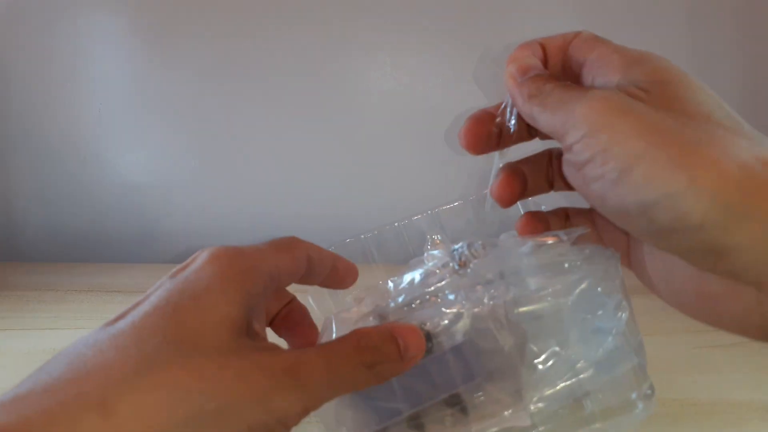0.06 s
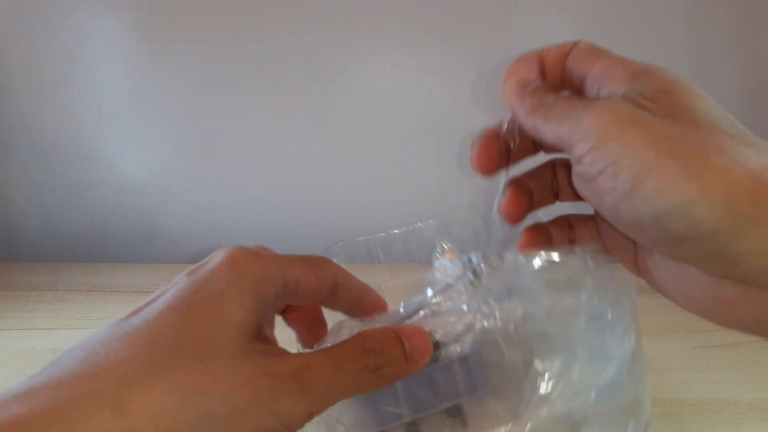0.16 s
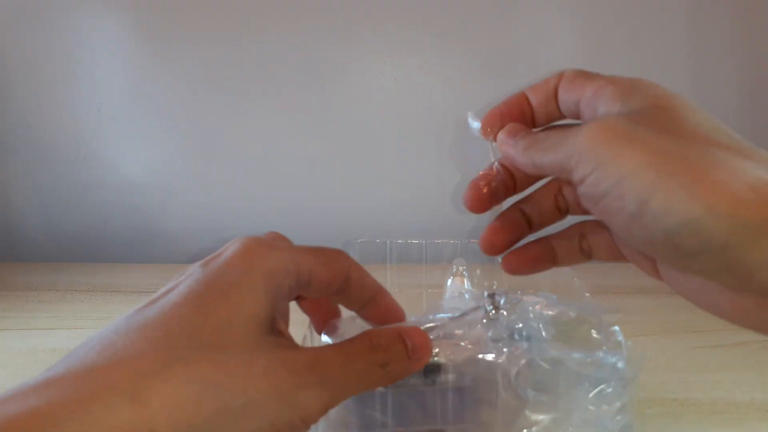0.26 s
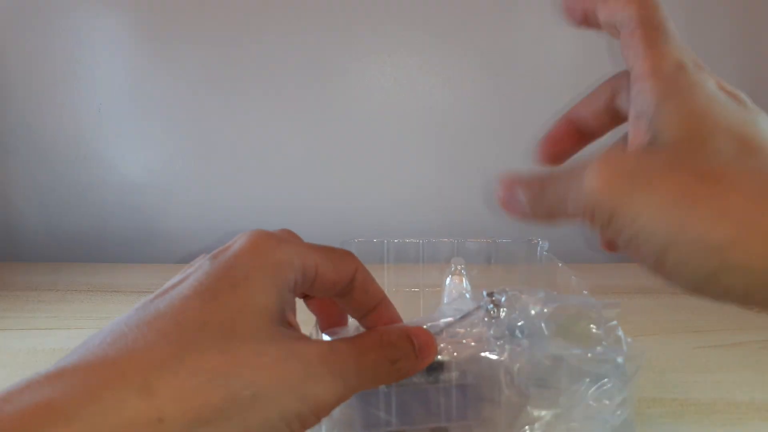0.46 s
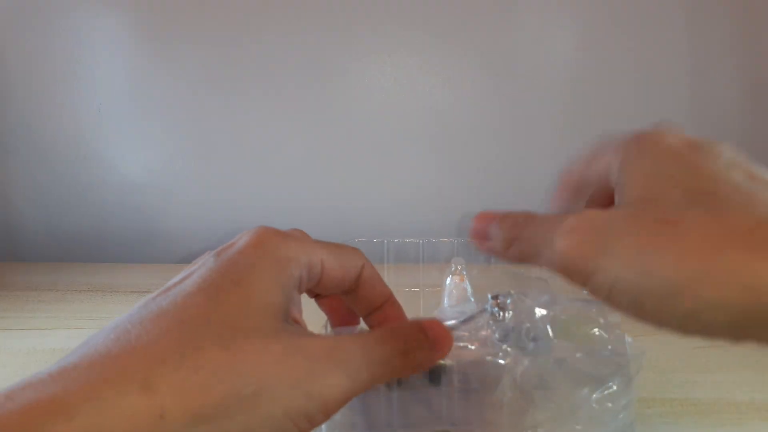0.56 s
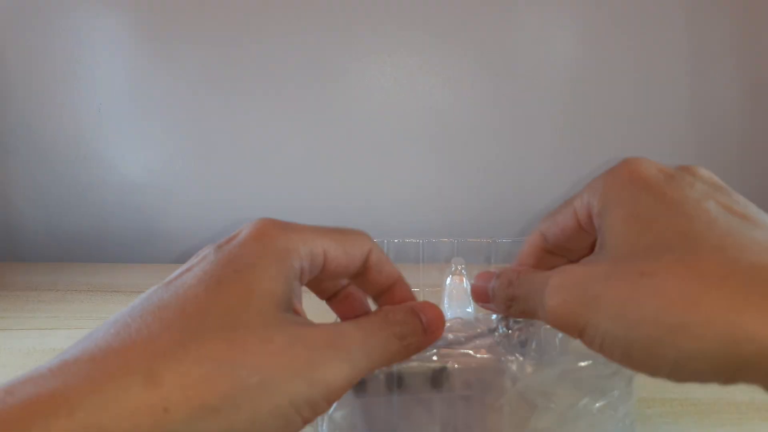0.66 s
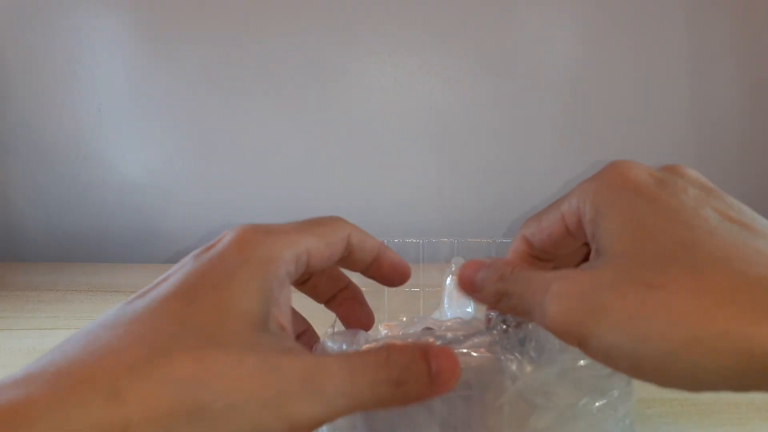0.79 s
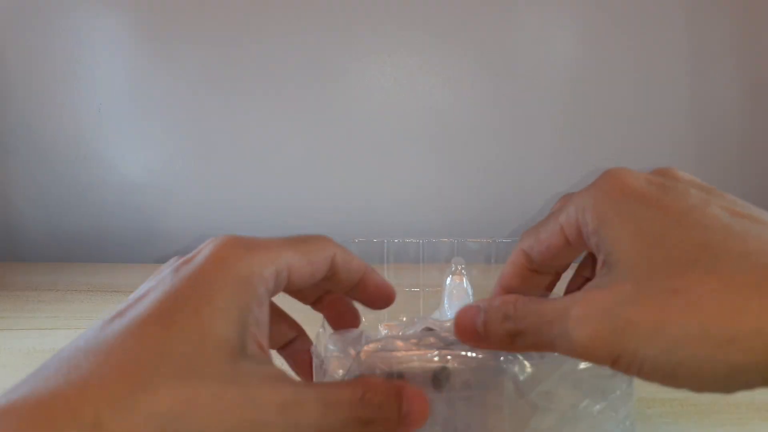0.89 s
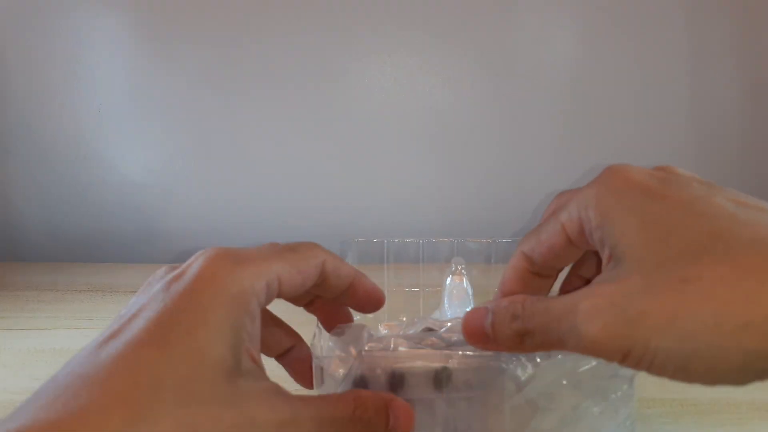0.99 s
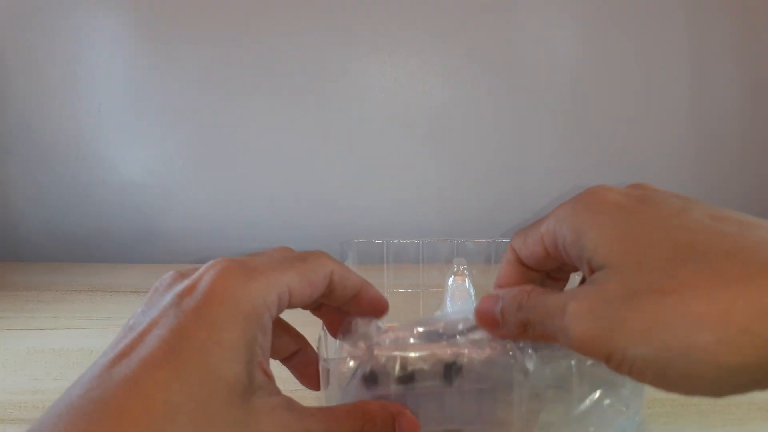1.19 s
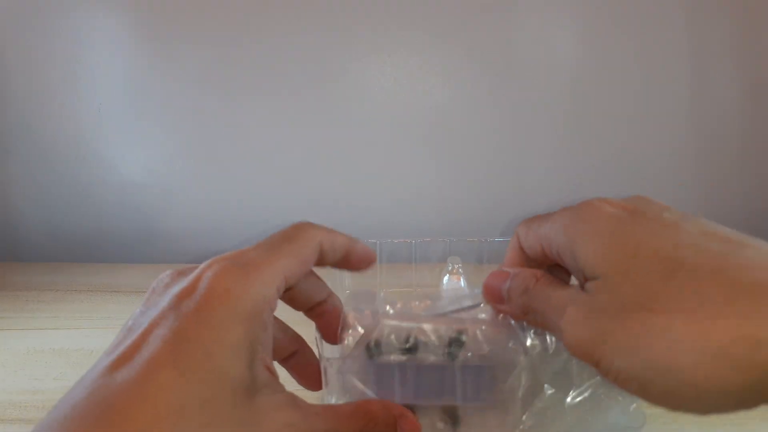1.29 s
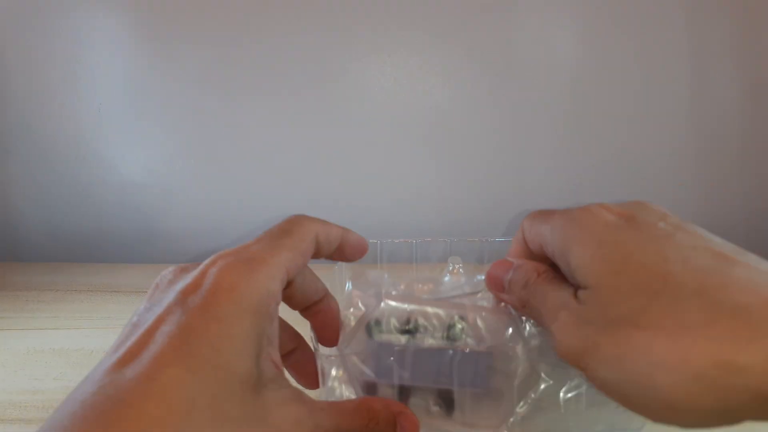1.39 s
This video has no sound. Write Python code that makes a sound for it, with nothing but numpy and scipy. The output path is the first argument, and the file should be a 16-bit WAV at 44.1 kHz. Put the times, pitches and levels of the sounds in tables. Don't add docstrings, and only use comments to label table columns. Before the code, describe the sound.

Plastic packaging crinkles under hands, close up in a small room. Sparse bright snaps lead to a sharp crackle and main knock on a wooden desk at 0.25 s, with a bounce and snaps near 0.38 s. After a lull, crackling swells around 0.7 s; a soft landing comes at 0.82 s. Quieter ticks follow, then a dense crinkle near 1.2 s thins out by 1.45 s over faint air.

```python
import sys
import numpy as np
from scipy import signal
from scipy.fft import rfft, irfft
from scipy.io import wavfile

SR = 44100
rng = np.random.default_rng(int(sys.argv[2]) if len(sys.argv) > 2 else 0)


def boost_factor(decibels):
    exponent = np.asarray(decibels, float) / 20
    return 10 ** exponent


def digitize_waveform(pressure):
    field = np.atleast_2d(pressure).T
    bounded = np.clip(field, -1, 1)
    quanta = np.round(bounded * 32767).astype(np.int16)
    wavfile.write(sys.argv[1], SR, quanta)


N = 63945


def shape(x, points):
    hz, db = np.array(points).T
    f = np.fft.rfftfreq(x.shape[-1], 1 / SR) + 1
    gain = boost_factor(np.interp(np.log(f), np.log(hz), db))
    return irfft(rfft(x) * gain, x.shape[-1])


def fade(t, t60):
    return boost_factor(-60 * t / t60)


def ring(modes, stretch, phase, size):
    hz, db, t60 = np.array(modes).T[:, :, None]
    t = np.arange(size) / SR
    waves = np.sin(2 * np.pi * hz * t + phase)
    return (boost_factor(db) * waves * fade(t, t60 * stretch)).sum(0)


def pair(size):
    mid, side = rng.standard_normal((2, size))
    side = signal.lfilter(*signal.butter(1, 1580, "high", fs=SR), side)
    return np.array([mid + side, mid - side]) / np.sqrt(2)


def sides(pan_db):
    return boost_factor(np.array([[pan_db], [-pan_db]]) / 2)


def add(out, x, t, pan_db):
    i = int(t * SR)
    x = x * sides(pan_db)
    out[:, i:i + x.shape[1]] += x[:, :N - i]


# time in seconds, crackle level in dB, hand side in dB (left minus right).
GRIP_PATH = [(0, -55.5, 0), (0.078, -71.5, -4.5), (.15, -64.5, -4.5), (0.188, -56.5, -2), (.3, -52, -2.5),
             (.42, -59, -3.5), (.5, -68.5, -4.5), (0.557, -73.5, -7.5), (0.601, -64, -1.5),
             (0.683, -50, -6), (.76, -61.5, -2.5), (0.902, -67, -7), (1.0, -71.5, -3), (1.09, -63.5, -7),
             (1.19, -51.5, -3), (1.26, -54.5, -4.5), (1.36, -63.5, -2.5), (1.45, -62.5, -7.5)]


def grip_db(t):
    g = np.array(GRIP_PATH)
    return np.interp(t, g[:, 0], g[:, 1])


def side_db(t):
    g = np.array(GRIP_PATH)
    return np.interp(t, g[:, 0], g[:, 2])


FILM_MODES_HZ = (3170, 4500, 5367, 7220)
# pitch in Hz, level in dB, t60 in seconds.
SHELL_MODES = [(867, -0.5, 0.02), (1039.5, -6, 0.033), (1411, -1.5, 0.017), (514, -5.5, 0.025)]


def snap(db, hz, shell_db, film_db):
    size, swell_s, burst_s, film_t60 = 1024, 0.0012, 0.0011, 0.0065
    clock = np.arange(size) / SR
    t = np.maximum(clock - swell_s, 0)
    c = rng.random(20)
    swell = np.clip(clock / swell_s, 0, 1) ** 4

    burst = signal.lfilter([1, 0.4, -1], [1.2], pair(size))
    burst = burst * np.exp(-t / (burst_s * (0.5 + c[0]))) * sides(5)

    modes = [(min(hz, SR / 3), 0, film_t60)]
    for k, f in enumerate(FILM_MODES_HZ):
        level = -27 * c[15 + k] - 3.5 - 9 * (k == 0)
        modes.append((f * (0.94 + 0.14 * c[10 + k]), level, film_t60))
    phases = [2 * np.pi * (c[2] + k * c[3] / 2) for k in range(2)]
    film = np.array([ring(modes, 0.89, phase, size) for phase in phases])
    film = film / fade(clock - t, film_t60)

    modes = []
    for k, (f, level, t60) in enumerate(SHELL_MODES):
        modes.append((f * (0.911 + 0.19 * c[4 + k]), level - 6 * c[19 - k], t60))
    shell = np.array([ring(modes, 0.92, k * 1.26 * (c[1] - 0.5), size) for k in (-1, 1)])
    shell = shell * (1 - np.exp(-t / 0.0012)) * np.linspace(1, 0, size)

    sharp = swell * (boost_factor(-4) * burst + boost_factor(film_db) * film)
    return boost_factor(db) * (sharp + boost_factor(shell_db + 7.5) * shell)


# start in seconds, peak in dB, film pitch in Hz, shell ring in dB
# against the peak, film ring in dB against the peak.
CREASE_SNAPS = [(0.0894, -23.5, 8340, -13, 2), (0.1628, -26.5, 5830, -13.5, -17),
                 (0.236, -44.5, 12900, 10.5, -12), (0.2458, -22.5, 2730, 0, -1.5),
                 (0.2492, -13, 4500, -13, -14), (0.2544, -30.5, 3600, 14, 12), (0.3478, -27, 7380, -5, -7),
                 (0.375, -15.5, 8920, -41, -1), (0.378, -20, 6940, -2, -16), (0.3822, -22.5, 13200, -32, -18),
                 (0.3873, -21, 3000, -20, -18), (0.4934, -33.5, 8030, -19, 8), (0.566, -37, 4500, -34, -0.5),
                 (0.572, -34.5, 7500, -11.5, 1.5), (0.5876, -37.5, 5360, -16, 1),
                 (0.6325, -28, 4460, -12.5, -6), (0.642, -39, 3130, -23, -1), (0.654, -31.5, 5600, 0, -23),
                 (0.6546, -36, 7670, -8, 12), (0.668, -48, 4140, -18, 10), (0.672, -58, 3030, -14, -3),
                 (0.6802, -23.5, 8210, -2.5, 6), (0.7152, -19, 7490, -18.5, -0.5),
                 (0.7331, -25, 8270, -15, -10),
                 (0.8098, -42, 4420, 14.5, 2), (0.8636, -33, 3300, -6, -10), (0.9295, -42, 3470, 1.5, 6),
                  (0.9404, -41.5, 3750, -10, -1.5), (0.9493, -33.5, 7940, -12, 6),
                  (0.9674, -39.5, 4520, -7.5, -5), (1.0004, -40, 6700, -16, -6),
                  (1.0294, -24.5, 4640, -13.5, -4.5), (1.066, -34, 12100, -17, -2),
                  (1.0706, -36.5, 3440, -22, -2.5), (1.101, -34.5, 6460, -35, 3), (1.1157, -33, 7200, -12, 3),
                  (1.1244, -37, 3140, -3, -2.5), (1.1324, -33.5, 3100, -10, -10), (1.1444, -47, 2950, -9, 5),
                 (1.1654, -36, 3900, 0.5, 3), (1.1717, -31.5, 7470, -0.5, -7), (1.1771, -36, 4000, -11, -3),
                (1.1815, -19, 7820, -20, -4), (1.1897, -28, 5000, -24, -4), (1.1968, -24, 5500, -10.5, -2),
                (1.2072, -40, 4400, -0.5, 3), (1.2195, -29, 5140, -3, -4), (1.2277, -28, 4970, -29, 4),
                (1.2339, -32, 8170, -6, 3), (1.265, -21.5, 7560, -19.5, -3.5), (1.28, -36.5, 9100, -3, 9.5),
                (1.291, -35.5, 7100, -6.5, -1), (1.3303, -29, 8740, -12.5, 5),
                (1.4004, -34.5, 8500, -4.5, 11), (1.4412, -35, 8250, -7, -3.5)]
# start in seconds, peak in dB, film pitch in Hz, shell ring
# in dB against the peak.
MORE_SNAPS = [(0.0604, -40.5, 7500, -16), (.2044, -49, 7400, -19), (.2134, -46, 7460, 2),
              (0.2212, -40, 8600, -9), (0.4228, -38, 8550, 0), (0.427, -48, 6580, -23),
              (0.4394, -34, 4120, -18), (.4434, -37, 5550, -10), (.4568, -33.5, 3960, -36),
              (0.477, -46, 12500, -28), (0.5242, -44, 7260, -24), (0.551, -57, 5170, -18),
              (0.6814, -25, 3390, -8.5), (0.923, -43, 7800, -25), (1.0074, -38.5, 3540, -12),
              (1.155, -45, 7000, -4), (1.1856, -23, 5100, -18), (1.1986, -31, 5430, -33),
              (1.266, -31, 3660, -8), (1.2824, -36, 5950, -31), (1.2864, -42, 8450, 4),
              (1.2924, -31, 3900, -18), (1.3104, -37, 7640, -1), (1.3264, -40, 8300, -23),
              (1.3444, -32.5, 5900, -7), (1.3813, -38, 8450, -10), (1.4164, -66, 4500, -11),
              (1.4434, -38, 6000, -28), (1.4474, -29, 11400, -10.5)]


def snaps():
    out = np.zeros((2, N))
    for t, db, hz, shell_db, film_db in CREASE_SNAPS:
        spot_db = side_db(t) + 0.47 * rng.standard_normal()
        add(out, snap(db, hz, shell_db, film_db), t, spot_db)
    for t, db, hz, shell_db in MORE_SNAPS:
        add(out, snap(db, hz, shell_db, film_db=-5), t, side_db(t))
    return out


def crackle():
    out = np.zeros((2, N))
    for when, size, pitch, hollow, spot in rng.random((int(420 * N / SR), 5)):
        t = when * (N - 1) / SR
        db = grip_db(t) + 4.5 - 4.5 * np.log(size + 0.031)
        tiny = snap(db, hz=2800 * 4 ** pitch, shell_db=-14 * hollow, film_db=-2)
        add(out, tiny, t, side_db(t) + 5 * (spot - 0.5))
    return out


def fizz():
    chance, size = rng.random((2, N))
    ticks = (chance < 2500 / SR) * boost_factor(-4 * np.log(size + 0.02))
    env = np.sqrt(signal.lfilter([1], [1, -0.96], ticks ** 2))
    grains = shape(env * pair(N), [(400, -21), (1200, 13.5), (2400, -1.5), (14000, -1.5)])
    return boost_factor(grip_db(np.arange(N) / SR) + 1.5) * grains / grains.std()


# start in seconds, length in seconds, level in dB.
FINGER_RUBS = [
    (.597, .017, -50),
    (.379, .07, -50),
]


def rubs():
    t = np.arange(N) / SR
    env = np.zeros(N)
    for start, length, db in FINGER_RUBS:
        rise = np.clip(2 * (t - start) / length, 0, 1)
        fall = np.clip(5 * (start + length - t) / length, 0, 1)
        env += boost_factor(db) * rise * fall
    return env * shape(pair(N), [(500, -39), (3000, 2.5), (7000, 10), (16000, 13)])


DESK_PAN_DB = -6
# pitch in Hz, level in dB, t60 in seconds.
DESK_MODES = [(61.2, -10, 1), (116.8, 3, 0.12), (224, -8, 0.022), (335.4, -1, 0.13), (450, -5.5, 0.075),
              (532, 2.5, 0.043), (680, 6, 0.047), (750, -10.5, 0.046), (1020, -5, 0.053), (1090, -19, .05),
              (1415, -19, 0.056), (1533, 1.5, 0.021), (1760, -4.5, 0.028), (2240, 3, 0.05)]
# start in seconds, level in dB, contact time in seconds,
# ring length as a factor, extra desk boom in dB.
DESK_HITS = [
    (0.2459, -19, 0.0006, 1.5, -23),
    (0.2508, -6, 0.00053, 0.73, -0.5),
    (0.3763, -13, 0.001, 0.23, -12),
    (.382, -30.5, 0.001, 0.3, -4.5),
    (.654, -33.5, 0.0015, 1.8, -21),
    (.811, -51, 0.00028, 0.62, 4),
    (0.8164, -20.5, 0.002, 0.31, -21),
    (0.831, -29, 0.0015, 0.75, -5),
    (.842, -31, 0.002, 0.43, -2),
]


def thuds():
    out, size = np.zeros((2, N)), 12000
    t = np.arange(size) / SR
    for start, db, contact, stretch, boom_db in DESK_HITS:
        push = np.sin(np.pi * np.clip(np.arange(256) / SR / contact, 0, 1))
        c = rng.standard_normal((len(DESK_MODES), 3))
        modes, partners = [], []
        for (f, level, t60), (a, detune, b) in zip(DESK_MODES, c):
            level = level + 0.7 * a + boom_db * (f < 280)
            modes.append((f, level, t60))
            partners.append((f * (1 + 0.035 * detune), level - 7 + b, t60 * 1.2))
        body = np.convolve(ring(modes + partners, stretch, 0, size), push / push.sum())[None, :size]

        touches = boost_factor(-24.5) * fade(t, 0.2) * (rng.random(size) < 0.06)
        mid, side = rng.standard_normal((2, size))
        touches = touches * (mid + 0.19 * side * np.array([[1], [-1]]))
        touches = signal.lfilter([0.1], [1, -0.9], touches)
        touches[:, 0] = 1
        body = signal.fftconvolve(body, touches, axes=1)[:, :size]

        rattle = shape(pair(size), [(200, -35), (700, 9), (3500, -7), (9000, -15.5)])
        rattle = rattle * boost_factor(1) * fade(t, 0.19 * stretch)
        add(out, boost_factor(db - 15.5) * (rattle - body), start, DESK_PAN_DB)
    return out


def rumble():
    low = shape(pair(N), [(20, -51), (60, -6), (130, -14.5), (330, -5.5), (900, -24.5)])
    return boost_factor(grip_db(np.arange(N) / SR) + 5.5) * low / low.std() * sides(DESK_PAN_DB)


# band centre in Hz, level in dB, t60 in seconds.
ROOM_BANDS = [(167, -3, 0.33), (410, 5, 0.29), (990, -2, 0.2), (2080, -3, 0.38), (4700, -1, 0.24),
              (10600, 3, 0.094)]


def room():
    size = SR // 2
    t, out = np.arange(size) / SR, np.zeros((2, size))
    for hz, db, t60 in ROOM_BANDS:
        band = shape(pair(size), [(hz / 4, -40), (hz / 1.33, 0), (hz * 1.094, 0), (hz * 4, -40)])
        out += boost_factor(db) * band * fade(t, t60) / np.sqrt(t60 * SR / 14)
    return out * np.clip(t / 0.0041, 0, 1)


def echoes(film, desk):
    tail = room()
    film = boost_factor(-4) * shape(film, [(5500, -1), (8100, -4.5), (11000, -2)])
    send = (film + desk).mean(0, keepdims=True)
    wet = signal.fftconvolve(send, tail, axes=1)[:, :N]
    lead = SR // 25
    knock = ring(DESK_MODES, 0.2, 0, lead) * boost_factor(-46)
    add(wet, signal.fftconvolve(knock[None], tail, axes=1)[:, lead:], 0, DESK_PAN_DB)
    return wet * sides(-3)


# frequency in Hz, level in dB per Hz.
AIR_COLOUR = [(18, -62), (30, -25), (319, -32), (740, -1), (889, -1), (2480, -36), (7870, -13.5),
              (9970, -22), (16000, -8)]


def background():
    air = shape(pair(N), AIR_COLOUR)
    return boost_factor(-58) * air / air.std()


def scene():
    film = snaps() + crackle() + fizz() + rubs()
    desk = thuds() + rumble()
    return film + desk + echoes(film, desk) + background()


def band_limit(x):
    return signal.sosfilt(signal.butter(12, 16990, fs=SR, output="sos"), x)


# frequency in Hz, gain in dB.
MIC_COLOUR = [(30, -42), (100, -10.5), (2000, 4), (6000, -1.5), (8200, -0.5), (9600, -9.5), (12000, -6.5),
              (16000, -8)]


def record(dry):
    top_cut = signal.ellip(8, 0.3, 60, 16050, fs=SR, output="sos")
    mix = signal.sosfilt(top_cut, shape(dry, MIC_COLOUR))
    return band_limit(mix)


dry = scene()
out = record(dry)
digitize_waveform(out)
```